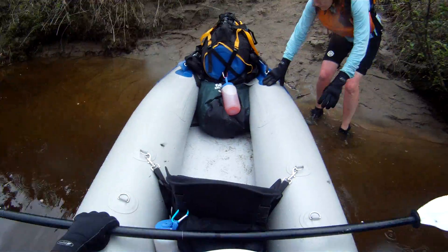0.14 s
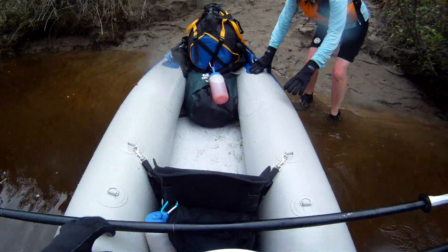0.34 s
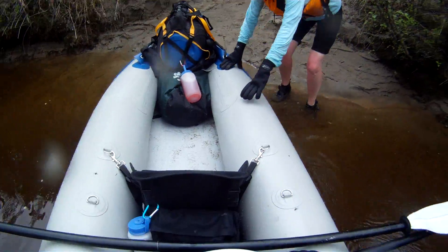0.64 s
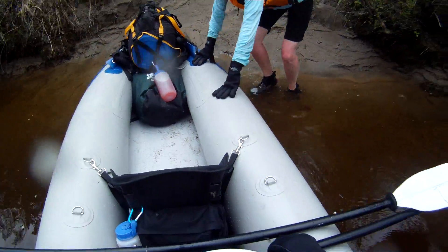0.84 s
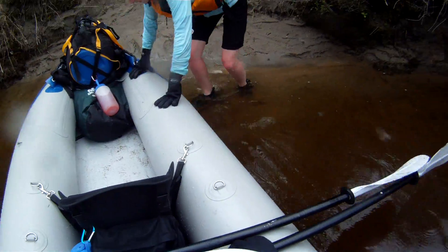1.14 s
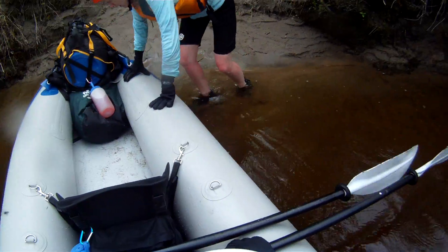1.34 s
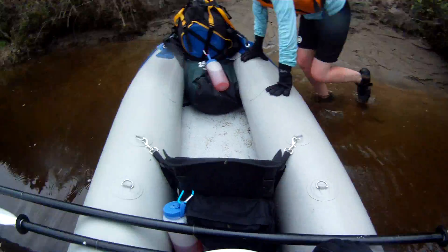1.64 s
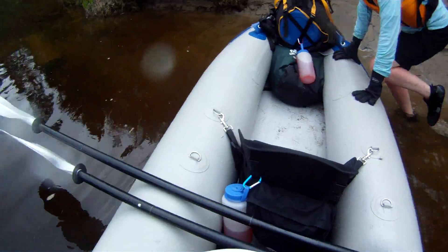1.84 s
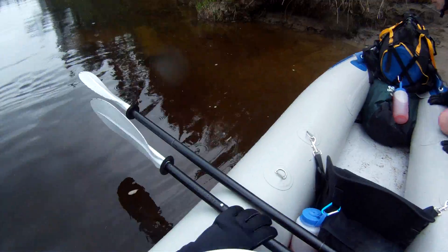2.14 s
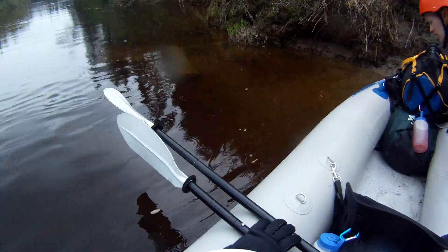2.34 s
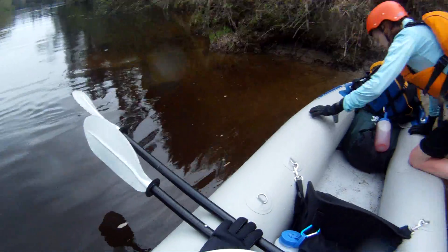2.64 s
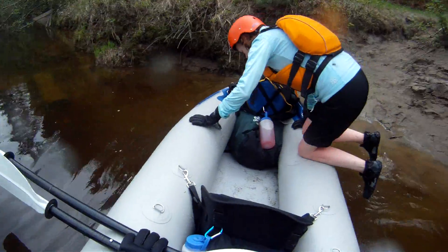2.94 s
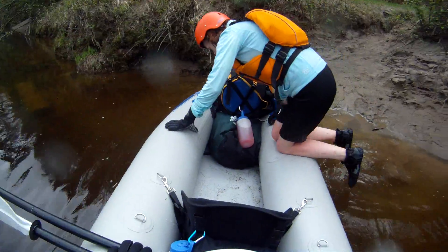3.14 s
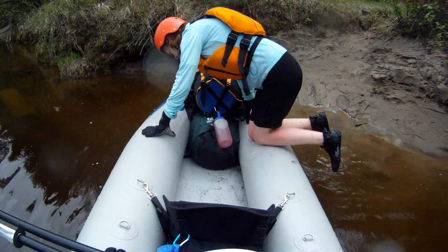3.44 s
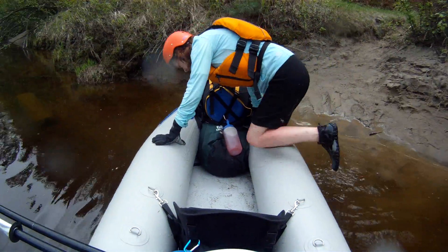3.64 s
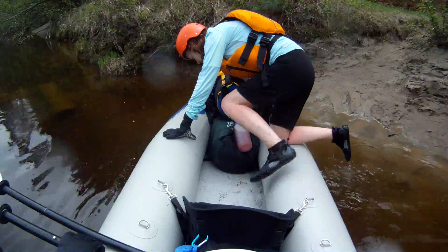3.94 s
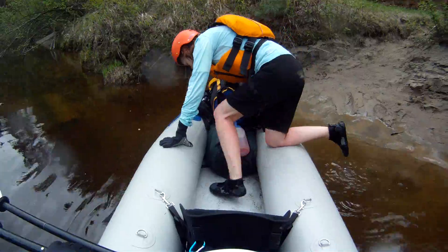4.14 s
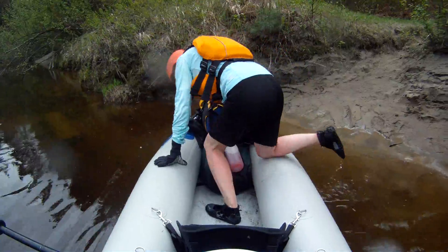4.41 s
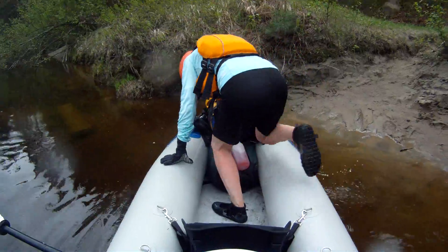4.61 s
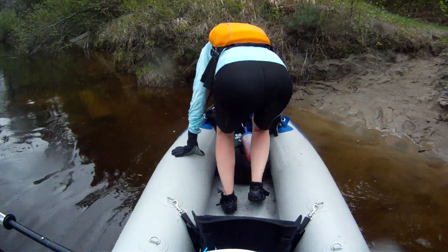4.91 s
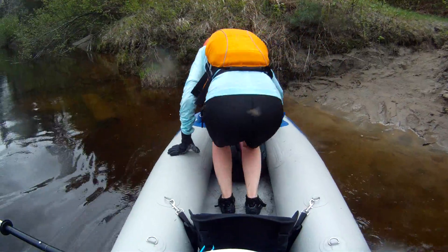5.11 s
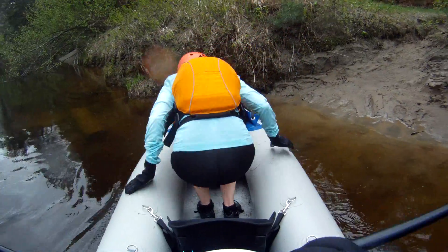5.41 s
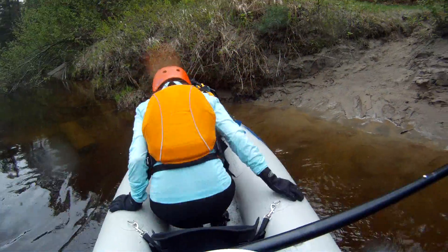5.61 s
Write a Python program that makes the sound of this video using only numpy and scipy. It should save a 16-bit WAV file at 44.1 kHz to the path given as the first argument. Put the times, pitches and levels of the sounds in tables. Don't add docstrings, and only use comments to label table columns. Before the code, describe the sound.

Close, boxed-in sound from a camera sealed in plastic on a paddler's helmet. Sharp ticks lead to one hard thump just before one second, followed by scraping and a firm low rub until about 1.4 seconds. Scattered clicks and low wobble continue, thinning out while a companion climbs into the inflatable boat with only faint rustle. Soft thuds and a brief rub come near the end.

```python
import sys
import numpy as np
from scipy import signal
from scipy.fft import rfft, irfft
from scipy.io import wavfile

SR = 44100
rng = np.random.default_rng(int(sys.argv[2]) if len(sys.argv) > 2 else 0)


def digitize_waveform(pressure):
    field = np.atleast_2d(pressure).T
    bounded = np.clip(field, -1, 1)
    quanta = np.round(bounded * 32767).astype(np.int16)
    wavfile.write(sys.argv[1], SR, quanta)


N = 254319
MOUNT_HZ = 68.3


def from_db(db):
    return 10 ** (np.asarray(db) / 20)


def rms_one(x):
    return x / np.sqrt(np.mean(x ** 2) + 1e-20)


def in_time(rows):
    s, *columns = np.transpose(rows)
    return [np.interp(np.arange(N) / SR, s, c) for c in columns]


def drift(rate):
    r = np.exp(-80 * np.pi * rate / SR)
    draws = rng.standard_normal(N // 40 + 2002)
    slow = signal.lfilter([1], [1, -2 * r, r * r], draws)[2000:]
    return np.interp(np.arange(N) / 40, np.arange(len(slow)), rms_one(slow))


def resonate(x, modes):
    out = 0
    for k, (hz, width, db) in enumerate(modes):
        r = np.exp(-np.pi * width / SR)
        b = (1 - r * r) / 2 * np.array([1, 0, -1])
        a = [1, -2 * r * np.cos(2 * np.pi * hz / SR), r * r]
        out = out + (-1) ** k * from_db(db) * signal.lfilter(b, a, x)
    return out


def band_noise(low_hz, high_hz):
    band = signal.butter(2, [low_hz, high_hz], "band", fs=SR, output="sos")
    return rms_one(signal.sosfilt(band, rng.standard_normal(N)))


def swing(hz, t60, seconds):
    t = np.arange(int(seconds * SR)) / SR
    return np.cos(2 * np.pi * hz * t) * from_db(-60 * t / t60)


def add(out, s, sound):
    at = int(s * SR)
    out[at:at + len(sound)] += sound[:N - at]


def grains(per_s, spread_db):
    sizes = from_db(spread_db * np.minimum(rng.exponential(1, N), 4)) * rng.choice([-1, 1], N)
    return sizes * (rng.random(N) < per_s / SR) + 1e-18


# frequency in Hz, level in dB per Hz.
HISS_TONE = [(59, -11), (100, -3.5), (156, -2.5), (346, -5.5), (403, -7), (706, -8), (926, -11.5),
             (1590, -10.5), (1960, -11.5), (2280, 1), (3150, -18.5), (5060, -19), (5800, -27), (7540, -33),
             (12800, -120)]


def hiss():
    hz, db = np.transpose(HISS_TONE)
    axis = np.fft.rfftfreq(N, 1 / SR) + 1
    colour = from_db(np.interp(np.log(axis), np.log(hz), db))
    noise = irfft(rfft(rng.standard_normal(N)) * colour, N)
    return from_db(-59.5 + 0.67 * drift(20)) * rms_one(noise)


# peak time in seconds, peak level in dB, length in seconds.
NODS = [(0.0, -51.5, 0.36), (0.275, -55, 0.16), (0.49, -54, 0.04), (0.609, -48, 0.073),
        (0.703, -57.5, 0.13), (0.828, -53, 0.13), (0.968, -55, .1), (1.028, -41.5, 0.079),
        (1.167, -38, 0.054), (1.306, -33.5, 0.13), (1.428, -44, .06), (1.552, -52.5, 0.031),
        (1.774, -53.5, 0.17), (2.028, -54.5, 0.12), (2.121, -45, 0.11), (2.294, -50, 0.077),
        (2.42, -44.5, 0.083), (2.585, -52.5, 0.13), (2.77, -53, 0.2), (3.027, -55, .06), (3.216, -71, .08),
        (3.33, -60.5, .1), (3.472, -56.5, 0.091), (3.705, -76, .12), (3.9, -61, .06), (4.105, -73, .06),
        (4.317, -67, .07), (4.425, -57, 0.033), (4.515, -71, .04), (5.06, -62, 0.18)]


def nodding():
    drop_db, rise_share = 18.0, 0.61
    t, level_db = np.arange(N) / SR, np.full(N, -80.0)
    for s, db, length in NODS:
        away = np.where(t < s, (s - t) / rise_share, t - s) / length
        level_db = np.maximum(level_db, db - drop_db * away)
    return level_db


# time in seconds, level in dB.
STIR = [(0.0, 7.5), (0.14, -1), (0.5, -2.5), (0.62, -4), (0.72, 0.5), (1.45, 1), (1.66, -2), (1.78, 9.5),
        (1.96, 3), (2.02, 5.5), (2.12, 4.5), (2.42, 3.5), (2.5, -2), (2.77, 0.5), (3.2, -8.5), (4.3, -3),
        (4.8, -15), (5.6, -3)]


def motion():
    wobble_db = nodding()
    stir_db, = in_time(STIR)
    pitch = MOUNT_HZ * (1 + 0.034 * drift(4.27))
    wobble = np.sqrt(2) * np.sin(2 * np.pi * np.cumsum(pitch) / SR) * from_db(2.8 * drift(27))
    sway_gain = from_db(-56.5 + 0.5 * stir_db + 1.5 * drift(3.1)) + from_db(wobble_db - 7.5)
    shudder_gain = from_db(-68.5) + from_db(wobble_db - 9.5)
    sway = sway_gain * band_noise(8, 30)
    shudder = shudder_gain * band_noise(40, 105)
    return from_db(wobble_db) * wobble + shudder + sway


def scuffs():
    stir_db, = in_time(STIR)
    t = np.arange(N) / SR
    aboard_s = 2.75
    aboard_db = (t > aboard_s) * (4.5 - 0.8 * (t - aboard_s))
    rustle = grains(1500, spread_db=1.5)
    tube = rms_one(resonate(rustle, [(264, 66, 0)]))
    shell = rms_one(resonate(rustle, [(536, 190, -12.5), (840, 107, 5.0)]))
    fabric = rms_one(resonate(rustle, [(1160, 210, -1.6), (1724, 280, -0.38)]))
    specks = grains(600, spread_db=-2.5)
    cavity = rms_one(resonate(specks, [(2197, 260, 0.0), (2554, 89, 2.5), (3300, 280, -9)]))
    tube_db = -71.5 + 1.34 * stir_db - 3 * drift(24.0)
    shell_db = -70 + 0.83 * stir_db + 0.8 * drift(18)
    fabric_db = -75 + 1.08 * stir_db
    cavity_db = -68 + aboard_db + 1.0 * drift(22.0)
    boat = from_db(fabric_db) * fabric + from_db(tube_db) * tube
    return boat + from_db(shell_db) * shell + from_db(cavity_db) * cavity


# start in seconds, peak level in dB, pitch in Hz, low part in dB, high part in dB.
TICKS = [(0.7418, -25, 2410, -17, -10), (0.822, -52, 2300, -13, -16), (0.8433, -30, 2020, -13, -7),
         (1.013, -30.5, 2420, -23, -13.5), (1.4163, -35.5, 2420, -11, -16.5), (1.609, -41, 2370, -5, -3),
         (1.7325, -45.5, 2450, -13, -24), (1.7574, -43.5, 2420, -22, -19),
         (1.8718, -30.5, 2155, -14.5, -10.5), (2.044, -33.5, 2420, -9, -10.5), (2.0861, -37, 2200, -9, -13),
         (2.6599, -43, 2070, -18, -12), (2.7299, -43.5, 2300, -8, -10), (2.8504, -40, 2290, -0.5, -10),
         (2.9823, -39, 2410, -13, -32), (3.0757, -40, 2440, -22, -23), (3.1703, -31, 2050, -7.5, -2.5),
         (3.3323, -45, 2200, -16, -24), (3.5898, -41, 2680, -23, -26), (3.8503, -42.5, 2160, -4.5, -7.5),
         (4.0943, -48.5, 2100, -2, 9.5), (5.314, -41, 2320, -23, -44), (5.4136, -46, 1530, 2, -14)]
HIGH_TICKS = [
    (0.7470, -29, 2305, -15, -25),
    (1.9834, -48.5, 2680, -9, -4),
    (2.0597, -43, 2820, -1.5, -13),
    (2.2922, -51, 2760, -3, -12),
    (3.3009, -45, 2860, -18, -10),
    (3.391, -46, 2810, -18, -21),
]
LOW_TICKS = [
    (0.7737, -50, 1600, -8, -14),
    (1.5438, -42, 1600, 2, -16),
    (4.901, -45, 1680, -6, -10),
]


def ticks():
    out, rows = np.zeros(N), TICKS + HIGH_TICKS + LOW_TICKS
    chances = rng.random((len(rows), 6))
    noises = rng.standard_normal((len(rows), 400))
    for (s, db, hz, low_db, high_db), c, noise in zip(rows, chances, noises):
        t60 = 0.01206 * min(hz / 2300, 1) ** 1.45
        snap = noise * swing(0, 0.0041, 1)[:len(noise)]
        add(out, s, from_db(db + high_db / 2 - 13.5) * snap)
        ring = swing(hz, 1.67 * t60, .05)
        ring = ring + 0.88 * swing(hz * (0.897 + 0.024 * c[0]), 0.96 * t60, .05)
        ring = ring + 0.11 * swing(hz * 0.884, 0.17 * t60, .05)
        dull = from_db(low_db) * swing(700 + 200 * c[1], 1.6 * t60, .05)
        door = swing(3400 + 200 * c[4], t60, .05)
        door = door - 0.25 * swing(4000 + 500 * c[2], 0.2 * t60, .05)
        door = door + 0.74 * swing(5030, 0.55 * t60, .05)
        crack = from_db(high_db + 4.0) * door
        soft = np.minimum(np.arange(len(ring)) / (0.0008 * SR), 1)
        add(out, s, from_db(db - 1) * soft * (0.7 * ring + dull + crack))
        add(out, s + t60 * (0.118 + 0.051 * c[3]), -from_db(db - 5) * soft * (ring + 0.77 * crack))
        add(out, s + t60 * (0.62 + .1 * c[5]), from_db(db - 13) * soft * ring)
    return out


# peak time in seconds, level in dB, direction, contact in seconds, mount ring in dB.
BIG_BLOW = [
    (0.8700, -16, -1, .013, -30),
    (0.8766, -8.2, 1, .0085, -9),
]
BLOWS = [
    (5.629, -28, -0.85, 0.012, -22),
    (5.636, -33, 1, 0.013, -25),
    (5.658, -30.2, 1, 0.015, -12),
    (5.703, -34.5, 0.97, 0.021, -1),
    (5.75, -47, 1, 0.019, -18),
]
# start in seconds, level in dB, pitch in Hz, 60 dB decay in seconds.
KNOCKS = [(0.7745, -47, 870, .045), (0.8608, -26, 760, 0.028), (2.335, -54, 820, .09),
          (2.445, -56, 790, 0.065), (2.695, -51.5, 720, 0.084), (5.4138, -46, 850, .012),
          (5.6228, -41, 650, .008), (5.672, -41, 3460, 0.017), (5.6745, -32, 1080, 0.024),
          (5.6765, -34, 710, .018), (5.691, -43, 3300, .012)]


def blows():
    out = np.zeros(N)
    for rows, give_t60 in ((BIG_BLOW, .095), (BLOWS, 0.024)):
        for s, db, direction, contact, ring_db in rows:
            push = np.hanning(int(contact * SR))
            give = swing(65, give_t60, .4)
            body = give + from_db(ring_db) * swing(MOUNT_HZ, 0.25, .4)
            sound = signal.fftconvolve(push, body)
            top = np.argmax(sound)
            add(out, s - top / SR, direction * from_db(db) * sound / sound[top])
    for s, db, hz, t60 in KNOCKS:
        knock = swing(hz, t60, .12)
        soft_start = np.minimum(np.arange(len(knock)) * hz / SR, 1)
        add(out, s, from_db(db) * knock * soft_start)
    return out


# frequency in Hz, width in Hz, level in dB.
SHELL = [(708, 133, 0), (990, 168, -1.5), (1210, 310, -13)]
RIM = [(1048, 140, 0)]
PADDING = [(271, 71, -5.5), (512, 66, -2)]
CAVITY = [(1510, 91, -4.5), (2070, 233, 5), (2670, 430, -11)]
DOOR = [(3480, 260, 0), (4550, 350, -15), (5100, 350, -14)]
LATCH = [(4970, 690, 0)]
# time in seconds, level in dB.
STROKES = [
    [(0.862, -42), (0.881, -48), (0.886, -39.5), (0.945, -52.5), (0.981, -62), (0.989, -62), (1.0, -56)],
    [(1.0, -66), (1.016, -59.5), (1.07, -55), (1.12, -63.5), (1.15, -54)],
    [(1.15, -41), (1.176, -42.5), (1.306, -32.5), (1.328, -33), (1.368, -35), (1.386, -44), (1.395, -44)],
    [(5.621, -59), (5.657, -50.5), (5.681, -47), (5.691, -53.5), (5.747, -58.5), (5.767, -66)],
]
# rim in dB, padding in dB, cavity in dB, door in dB.
STROKE_COLOUR = [(-11, 4.5, -7.5, -8.5), (0, -5, -4, -1), (-25, -4.5, -8, -23), (-3.5, -3.5, -5, -4.5)]
FOLLOWS = (0.69, 1.52, 0.63, 1)


def rubbing():
    grip = from_db(1.7 * drift(38))
    slips = [grip * grains(6000, spread_db=2.2) for _ in range(3)]
    parts = (SHELL, RIM, PADDING, CAVITY, DOOR)
    shell, *others = [rms_one(resonate(slips[k % 3], modes)) for k, modes in enumerate(parts)]
    soft = signal.butter(3, 3130, fs=SR, output="sos")
    shell, *others[:-1] = signal.sosfilt(soft, [shell, *others[:-1]])
    latch = rms_one(resonate(resonate(slips[0], LATCH), LATCH))
    shell = shell + from_db(-31.5) * latch
    others[-1] = rms_one(resonate(others[-1], [(3250, 530, 3), (5360, 520, -4.0)]))
    out, t = np.zeros(N), np.arange(N) / SR
    for rows, colour_db in zip(STROKES, STROKE_COLOUR):
        level_db, = in_time(rows)
        below_peak_db = level_db - level_db.max()
        stroke = shell
        for part, db, share in zip(others, colour_db, FOLLOWS):
            stroke = stroke + from_db(db + (share - 1) * below_peak_db) * part
        on = np.clip(np.minimum(t - rows[0][0], rows[-1][0] - t) / .002, 0, 1)
        out += on * from_db(level_db) * stroke
    return out


# first step down in seconds, first gap of the quickening
# drops in seconds, steps a drop, last step up in seconds, amplifier offset in full scale.
LIMITER = [
    (0.8769, .00055, 2, 0.9770, .5),
    (0.8775, .0012, 1, 0.9385, -.22),
]


def limiter(x):
    step_db, step_up_s, coupling_hz = .5, .0037, 38
    t, out = np.arange(N) / SR, []
    for channel, (first, gap, size, last, offset) in zip(x, LIMITER):
        down = size * np.ceil(((t - first) / gap).clip(0) ** 1.5)
        left_to_climb = np.ceil((last - t) / step_up_s)
        gain = from_db(-step_db * np.minimum(down, left_to_climb).clip(0))
        coupling = signal.butter(1, coupling_hz, "high", fs=SR)
        jolts = signal.lfilter(*coupling, offset * (gain - 1))
        out.append(gain * channel + jolts)
    return np.array(out)


def scene():
    mono = hiss() + motion() + scuffs() + ticks() + blows() + rubbing()
    return mono + from_db(-68.5) * rng.standard_normal((2, N))


def roll_off(x):
    return signal.sosfilt(signal.butter(12, 16470, fs=SR, output="sos"), x)


def record(dry):
    held_rate_hz, out_rate_hz = 12000, 48000
    band_limit = signal.cheby1(10, .5, 5620, fs=SR, output="sos")
    band = signal.sosfilt(band_limit, limiter(dry))
    hz = np.fft.rfftfreq(N, 1 / SR) + 1e-6
    hold = np.sin(np.pi * hz / held_rate_hz) / (4 * np.sin(np.pi * hz / out_rate_hz))
    mirrored = band * (1 - 2 * np.cos(2 * np.pi * held_rate_hz * np.arange(N) / SR))
    held = irfft(rfft(mirrored) * hold, N)
    low_pass = signal.cheby1(10, .5, 15050, fs=SR, output="sos")
    mix = signal.sosfilt(low_pass, held)
    return roll_off(mix)


dry = scene()
out = record(dry)
digitize_waveform(out)
```